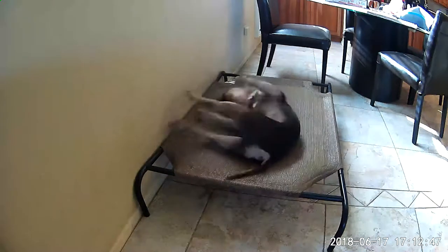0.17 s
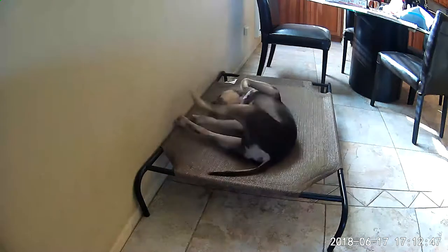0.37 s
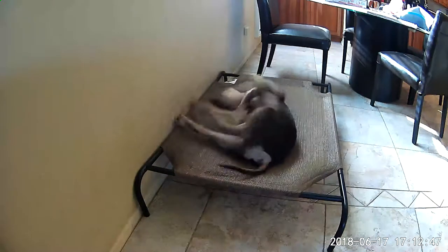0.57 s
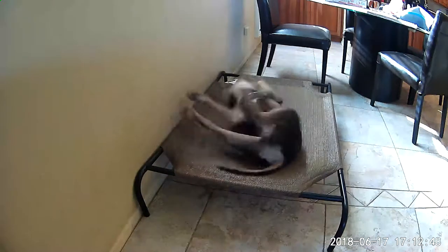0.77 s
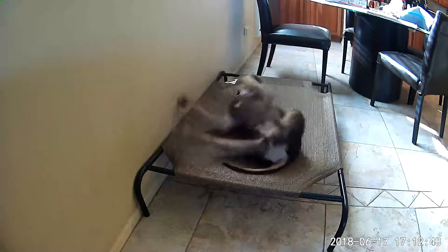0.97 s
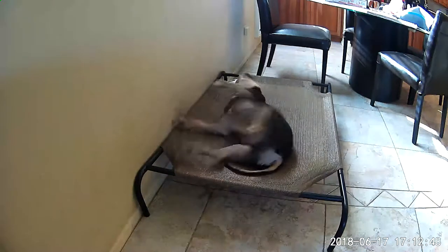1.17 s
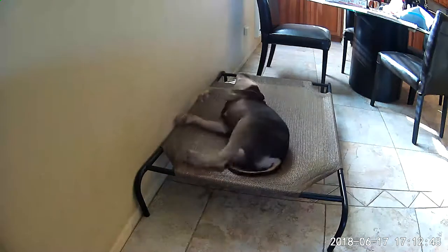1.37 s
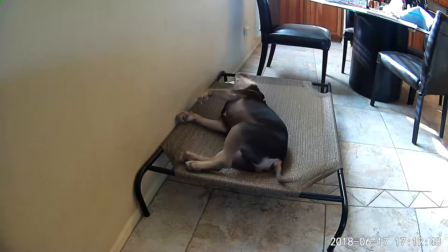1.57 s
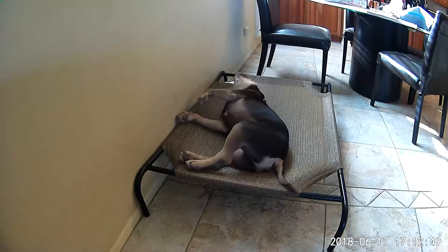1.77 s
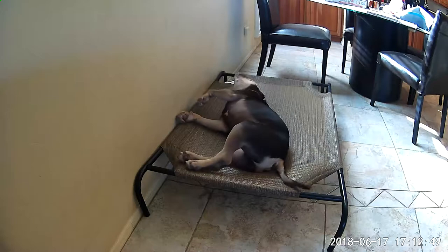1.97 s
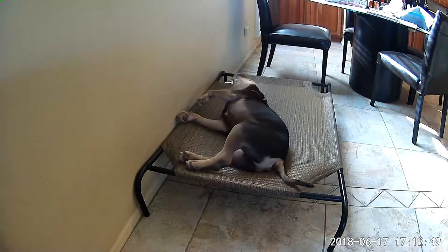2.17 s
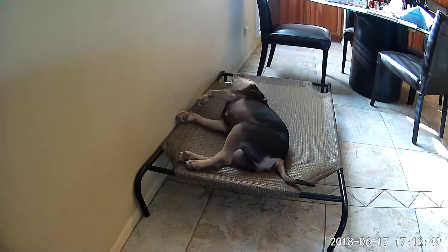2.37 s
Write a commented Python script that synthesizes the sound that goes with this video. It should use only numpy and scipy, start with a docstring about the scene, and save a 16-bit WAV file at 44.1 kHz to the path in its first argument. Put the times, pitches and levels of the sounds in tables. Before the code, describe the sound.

A puppy grumbles briefly, barks gruffly, growls, barks again longer and higher, then rasps softly while rolling on its bed; echoing tiled room, small muffled microphone overloading on the barks.

```python
"""A short grumble, then a gruff bark; a rolling growl leads to a second bark, and a softer rasp closes.
A puppy rolls about in a tiled room, its bed rumbling under it as unevenly fluttering low noise.
The voice is a rough pulse train with air in throat resonances, heard mostly through the ringing room.
Thin tones are wavering sines. A small narrow-band microphone and its converter overload on both barks."""
import sys
import numpy as np
from scipy import signal
from scipy.fft import rfft, irfft
from scipy.io import wavfile
from scipy.ndimage import uniform_filter1d

SR = 44100
rng = np.random.default_rng(int(sys.argv[2]) if len(sys.argv) > 2 else 0)


def transcribe(signal):
    """Save signal, clipped to [-1, 1], as a 16-bit WAV file at the path in sys.argv[1]."""
    frames = np.atleast_2d(signal).T
    limited = np.clip(frames, -1, 1)
    pcm = np.round(limited * 32767).astype(np.int16)
    wavfile.write(sys.argv[1], SR, pcm)


N = 105840
TIME_S = np.arange(N) / SR

# barks: [time_s, level_db, pitch_hz, mouth_hz]
FIRST_BARK = [(.19, -49, 250.9, 730), (.22, -17, 264.1, 800), (.245, -2, 274.4, 874), (.30, -1, 296.4, 895),
              (.335, -4, 291.8, 813), (.395, -10.5, 259.8, 757), (.445, -36, 229.7, 830)]
SECOND_BARK = [(.955, -30, 201.1, 834), (.99, -10, 243.9, 829), (1.025, 0, 262.3, 893),
               (1.08, -1.5, 324.9, 1002), (1.14, -0.5, 328.7, 741), (1.195, -24, 329.1, 897),
               (1.24, -12.5, 322.3, 977), (1.29, -20, 323.6, 973), (1.33, -27, 303.8, 1037)]
# fixed throat resonances in each bark: [centre_hz, width_hz, relative_db]
FIRST_BARK_THROAT = [(598.5, 100, -6.5), (763, 110, 1.5), (1087.5, 111, -2), (1719, 175, -13.5),
                     (2640, 450, -35.5)]
SECOND_BARK_THROAT = [(688.3, 113, -9.5), (1006, 108, -9), (1680, 390, -22), (2610, 300, -35.5)]
# grumble before the first bark, growl between the barks, closing rasp: [time_s, level_db, pitch_hz]
GRUMBLE = [(.08, -77, 186.9), (.13, -41, 207.8), (.18, -31.5, 209.1), (.22, -26.5, 229)]
GROWL = [(.55, -29.5, 205), (.595, -10, 182), (.635, -13.5, 180), (.66, -13, 212), (.695, -19, 226),
         (.745, -14.5, 207), (.79, -16.5, 170), (.87, -26.5, 164), (.93, -18.5, 172), (.97, -22, 200)]
RASP = [(1.66, -45.5, 121.5), (1.70, -34.5, 118.7), (1.77, -26, 112.1), (1.92, -30.5, 113),
        (2.05, -28, 114.7), (2.17, -29.5, 110.3), (2.30, -31, 113.2), (2.40, -39.5, 109.3)]
# their throat resonances: [centre_hz, width_hz, relative_db]
GRUMBLE_THROAT = [(120, 76, -25), (215, 220, -3.5), (520, 470, -9.5), (770, 43, 8), (1000, 72, 0.5),
                  (2430, 970, -49.5)]
GROWL_THROAT = [(232, 52, -24.5), (390, 150, -19), (680, 65, -15.5), (922.6, 179, 19.5), (1010, 37, -18),
                (1720, 110, -24.5), (3030, 3500, -32.5)]
RASP_THROAT = [(130, 18, -17), (226, 47, -14), (338, 23, -21), (513, 59, -8.5), (755.5, 61, 0),
               (835.5, 101, 4.5), (931, 90, -12.5), (1950, 106, -34), (3370, 1600, -48)]
# clear voice inside the growl: [time_s, level_db]
VOICING = [(.56, -45.5), (.59, -44), (.63, -49.5), (.675, -35.5), (.745, -34.5), (.775, -53.5), (.85, -47),
           (.97, -47.5)]
# its harmonics from the first up: [relative_db]
HARMONICS_DB = [1.5, 6.5, -4, 10]
# thin nasal whistles: [start_s, length_s, start_hz, end_hz, level_db]
WHISTLES = [(0.65, 0.16, 2000, 1822, -40), (0.677, 0.065, 2300, 2280, -46), (1.615, .08, 500, 453, -45.5),
            (1.917, .19, 452, 462, -41.5)]
# reverberation time: [band_hz, t60_s]
ROOM_T60 = [(100, 0.42), (270, 0.9), (390, 1), (700, 0.42), (1000, 0.79), (1800, 0.79), (4000, 0.59)]
# bed rumble under the rolling body: [time_s, level_db]
BED_LEVEL = [(.08, -61), (.12, -59), (.2, -66), (.5, -40), (.6, -68), (.95, -69), (1.36, -49),
             (1.45, -69.5), (1.65, -57), (1.70, -45.5), (2.0, -51), (2.4, -58)]
# bed rumble spectrum: [frequency_hz, relative_db_per_hz]
BED_SPECTRUM = [(10, 13.5), (22, 0), (45, -15.5), (110, -7.5), (200, -18), (400, -67)]
# still-room noise spectrum: [frequency_hz, relative_db_per_hz]
FLOOR_SPECTRUM = [(20, -5.5), (100, 14.5), (300, 9.5), (900, 1), (1400, -12), (4000, -18.5)]

# jitter: log-pitch spread; air: noise amplitude relative to the pulses
BARK_JITTER, BARK_AIR = 0.04, 0.68
GROWL_JITTER, GROWL_AIR = 0.03, 0.4
RASP_JITTER, RASP_AIR = 0.32, 0.9  # also the grumble
BARK_LOW_CUT_HZ, MOUTH_WIDTH_HZ = 486, 238
FLUTTER_HZ, FLUTTER_DB = 70, 4.5  # loose lips and palate shake the level
# the nose swallows this band when the mouth is shut
NASAL_DIP_HZ, NASAL_DIP_WIDTH_HZ, NASAL_LEAK_DB = 1360, 615, -17
GROWL_NOSE_SHARE = 0.89  # amplitude share of the growl leaving through the nose
VOICE_WAVER, VOICE_SHIMMER_DB = 0.021, 3.5  # waver: relative pitch spread
WHISTLE_WAVER = 0.006
TONE_ROOM_DB = -6  # clear tones reach the microphone mostly direct
DIRECT_DB, ROOM_BUILD_S = -2, 0.0033
BED_FLUTTER_DB, BED_FLUTTER_HZ = 6, 19
FLOOR_DB = -72.5
MIC_CEILING, KNEE, LOPSIDED = 0.74, 8.7, 0.25  # fairly hard, slightly asymmetric overload
MIC_TOP_HZ, CUTOFF_HZ = 4000, 16300
CONVERTER_TOP, CONVERTER_HZ = 0.69, 8000
SPLATTER_DB, SPLATTER_TOP_HZ = -1.5, 8200
IMAGE_DB, SECOND_IMAGE_DB, IMAGE_TOP_HZ = -15, -21, 2580


def from_db(db):
    """Decibels to amplitude gain."""
    return 10 ** (np.asarray(db) / 20)


def rms_one(x):
    """Scale to unit power."""
    return x / np.sqrt(np.mean(x ** 2) + 1e-20)


def at_hz(points, hz):
    """Interpolate a table on a log-frequency axis."""
    table_hz, value = np.transpose(points)
    return np.interp(np.log(np.maximum(hz, 1)), np.log(table_hz), value)


def controls(rows):
    """Per-sample gain, silent outside the table's span, then the other columns."""
    time_s, level_db, *others = np.transpose(rows)
    inside = (TIME_S >= time_s[0]) & (TIME_S <= time_s[-1])
    gate = uniform_filter1d(inside * 1.0, size=200)
    gain = gate * from_db(np.interp(TIME_S, time_s, level_db))
    return [gain] + [np.interp(TIME_S, time_s, column) for column in others]


def drift(corner_hz):
    """Smooth random wander of RMS 1: noise through a double pole."""
    pole = np.exp(-2 * np.pi * corner_hz / SR)
    white = rng.standard_normal(N + SR)
    return rms_one(signal.lfilter([1], [1, -2 * pole, pole ** 2], white)[SR:])  # drop the run-in


def butter(x, order, hz, kind):
    """Butterworth filter."""
    return signal.sosfilt(signal.butter(order, hz, kind, fs=SR, output="sos"), x)


def bark(rows, formants):
    """A hoarse shout of air; the jaw opens and closes over it, moving one resonance."""
    gain, pitch_hz, mouth_hz = controls(rows)
    source = folds(pitch_hz, BARK_JITTER, BARK_AIR)
    shaped = mouth(source, mouth_hz) + throat(source, formants)
    return gain * evened(butter(shaped, 6, BARK_LOW_CUT_HZ, "high"))


def growl(rows, formants, jitter, air):
    """Fluttering pulses through a nearly closed mouth."""
    gain, pitch_hz = controls(rows)
    flutter = from_db(FLUTTER_DB * drift(FLUTTER_HZ))
    return gain * evened(flutter * throat(folds(pitch_hz, jitter, air), formants))


def folds(pitch_hz, jitter, air):
    """Vocal folds: uneven pulses, with a decaying puff of air in each cycle."""
    cycles = np.cumsum(pitch_hz * np.exp(jitter * drift(70))) / SR
    clicks = np.diff(np.floor(cycles), prepend=0)
    pulses = clicks * from_db(1.5 * rng.standard_normal(N))
    puffs = rng.standard_normal(N) * np.exp(-3 * (cycles % 1))
    return rms_one(pulses) + air * rms_one(puffs)


def throat(x, formants):
    """Parallel fixed resonances with steep flanks and unit gain before weighting."""
    out = np.zeros(N)
    for hz, width_hz, db in formants:
        out += from_db(db) * butter(x, 2, [hz - width_hz / 2, hz + width_hz / 2], "band")
    return out


def mouth(x, hz):
    """Jaw-driven resonance: shift its centre to 0 Hz, low-pass, shift back."""
    turn = np.exp(2j * np.pi * np.cumsum(hz) / SR)
    return 2 * np.real(turn * butter(x / turn, 2, MOUTH_WIDTH_HZ / 2, "low"))


def evened(x):
    """Hold short-term voice power steady, over 1300 samples."""
    return x / np.sqrt(uniform_filter1d(x ** 2, size=1300) + 1e-12)


def through_nose(x):
    """The nasal passage cuts a dip in the spectrum; a little leaks past."""
    edges_hz = [NASAL_DIP_HZ - NASAL_DIP_WIDTH_HZ / 2, NASAL_DIP_HZ + NASAL_DIP_WIDTH_HZ / 2]
    return butter(x, 2, edges_hz, "bandstop") + from_db(NASAL_LEAK_DB) * x


def clear_voice():
    """Low harmonics on the growl's pitch, each trembling in level."""
    pitch_hz = controls(GROWL)[1] * (1 + VOICE_WAVER * drift(40))
    phase = 2 * np.pi * np.cumsum(pitch_hz) / SR
    tone = np.zeros(N)
    for harmonic, db in enumerate(HARMONICS_DB, 1):
        tone += from_db(db + VOICE_SHIMMER_DB * drift(44)) * np.sin(harmonic * phase)
    return controls(VOICING)[0] * tone


def whistles():
    """Short wavering sine glides that swell and fade."""
    out, waver = np.zeros(N), 1 + WHISTLE_WAVER * drift(30)
    for start_s, length_s, start_hz, end_hz, db in WHISTLES:
        along = np.clip((TIME_S - start_s) / length_s, 0, 1)
        hz = (start_hz + (end_hz - start_hz) * along) * waver
        swell = np.sqrt(8 * along * (1 - along))
        out += from_db(db) * swell * np.sin(2 * np.pi * np.cumsum(hz) / SR)
    return out


def room(x):
    """Direct sound plus a dense tail off tiles and walls, each half-octave dying at its own rate."""
    t = TIME_S[:SR]
    edges_hz = 40 * 2 ** (np.arange(15) / 2)
    tail = np.zeros(SR)
    for low, high in zip(edges_hz, edges_hz[1:]):
        band = butter(rng.standard_normal(SR), 4, [low, high], "band")
        decay = from_db(-60 * t / at_hz(ROOM_T60, np.sqrt(low * high)))
        band = band * decay * (1 - np.exp(-t / ROOM_BUILD_S))
        tail += band * np.sqrt(2 * (high - low) / SR / np.sum(band ** 2))  # energy by bandwidth
    return from_db(DIRECT_DB) * x + signal.fftconvolve(x, tail)[:N]


def bed_rumble():
    """The bed under the rolling body: low noise, unevenly fluttering in level."""
    flutter = from_db(BED_FLUTTER_DB * drift(BED_FLUTTER_HZ))
    return controls(BED_LEVEL)[0] * flutter * noise(BED_SPECTRUM)


def still_room():
    """Steady coloured noise floor."""
    return from_db(FLOOR_DB) * noise(FLOOR_SPECTRUM)


def noise(spectrum):
    """Coloured noise of unit power, shaped in the frequency domain."""
    hz = np.arange(N // 2 + 1) * SR / N
    return rms_one(irfft(rfft(rng.standard_normal(N)) * from_db(at_hz(spectrum, hz)), N))


def scene():
    """The puppy's calls in the room, over its bed and the noise floor."""
    barks = bark(FIRST_BARK, FIRST_BARK_THROAT) + bark(SECOND_BARK, SECOND_BARK_THROAT)
    grumble = growl(GRUMBLE, GRUMBLE_THROAT, RASP_JITTER, RASP_AIR)
    rasp = growl(RASP, RASP_THROAT, RASP_JITTER, RASP_AIR)
    rolling = growl(GROWL, GROWL_THROAT, GROWL_JITTER, GROWL_AIR)
    nasal = through_nose(grumble + rasp + GROWL_NOSE_SHARE * rolling)
    voice = barks + nasal + (1 - GROWL_NOSE_SHARE) * rolling
    tones = clear_voice() + whistles()
    in_room = room(voice + from_db(TONE_ROOM_DB) * tones)
    return (in_room + tones + bed_rumble() + still_room())[None]


def microphone(x):
    """A lopsided soft-knee overload, then a steep zero-phase low-pass."""
    over = np.maximum(np.abs(x) - MIC_CEILING, 0)
    bent = x + LOPSIDED * butter(over, 1, 30, "high")
    loaded = bent / (1 + np.abs(bent / MIC_CEILING) ** KNEE) ** (1 / KNEE)
    return signal.sosfiltfilt(signal.butter(14, MIC_TOP_HZ, fs=SR, output="sos"), loaded)


def converter(x):
    """Clipped peaks add splatter, and mirror images around the rate and its double."""
    excess = np.clip(x, -CONVERTER_TOP, CONVERTER_TOP) - x
    splatter = signal.sosfiltfilt(signal.butter(1, SPLATTER_TOP_HZ, fs=SR, output="sos"), excess)
    mirrored = signal.sosfiltfilt(signal.butter(1, IMAGE_TOP_HZ, fs=SR, output="sos"), excess)
    turn = 2 * np.pi * CONVERTER_HZ * TIME_S
    carriers = from_db(IMAGE_DB) * np.cos(turn) + from_db(SECOND_IMAGE_DB) * np.cos(2 * turn)
    return x + from_db(SPLATTER_DB) * splatter + 2 * mirrored * carriers


def record(dry):
    """Microphone, converter and a final steep top cut."""
    top_cut = signal.cheby2(12, 70, CUTOFF_HZ, fs=SR, output="sos")
    return signal.sosfilt(top_cut, converter(microphone(dry)))


dry = scene()
out = record(dry)
transcribe(out)
```